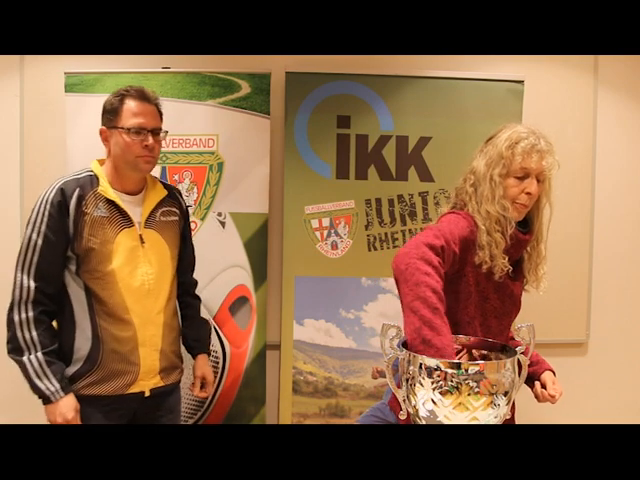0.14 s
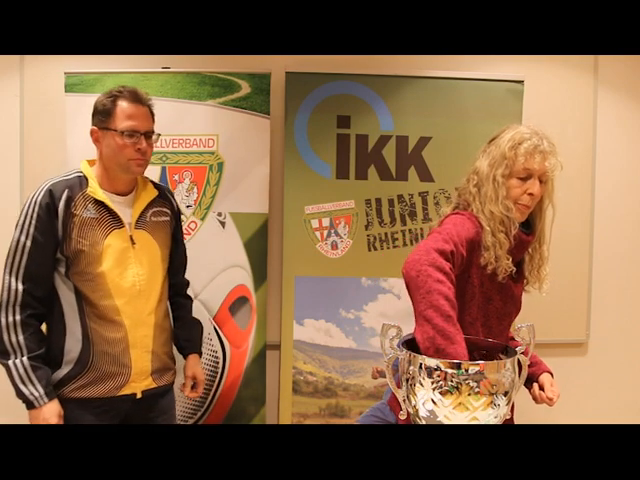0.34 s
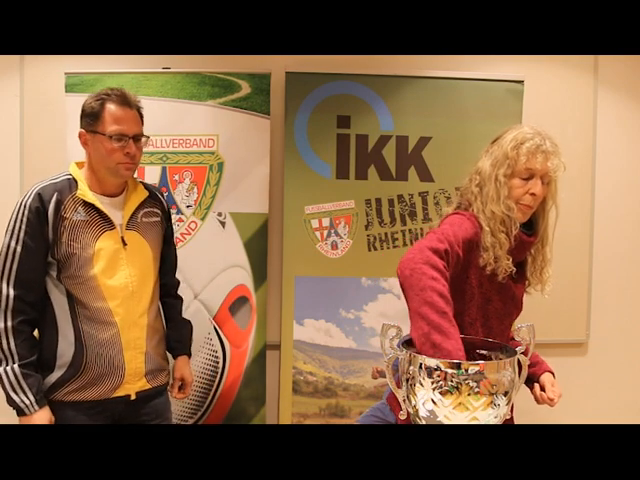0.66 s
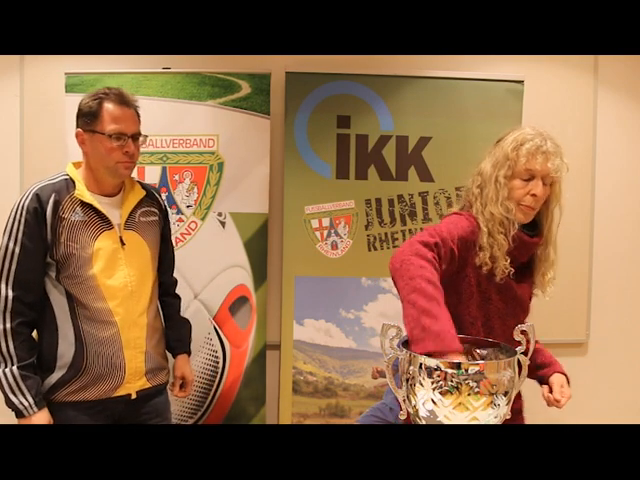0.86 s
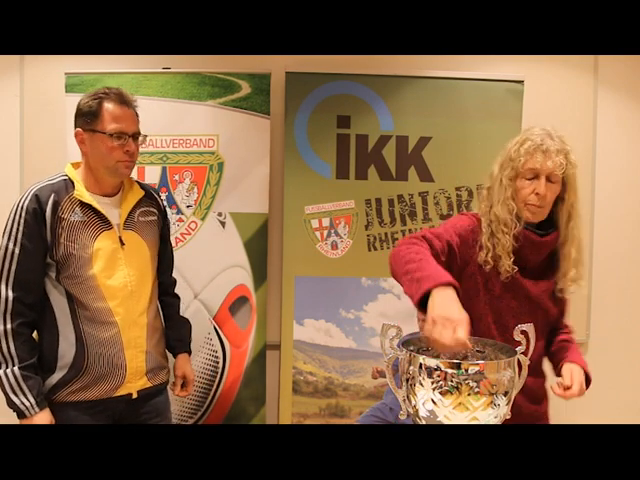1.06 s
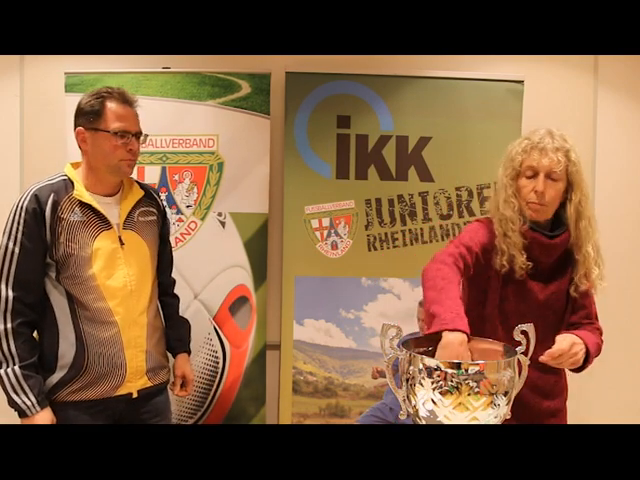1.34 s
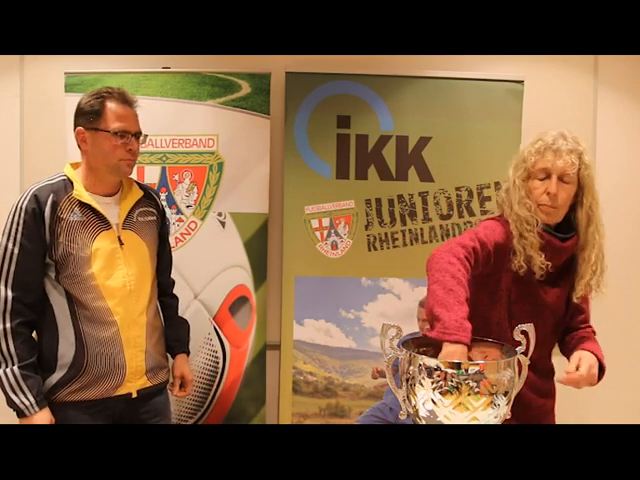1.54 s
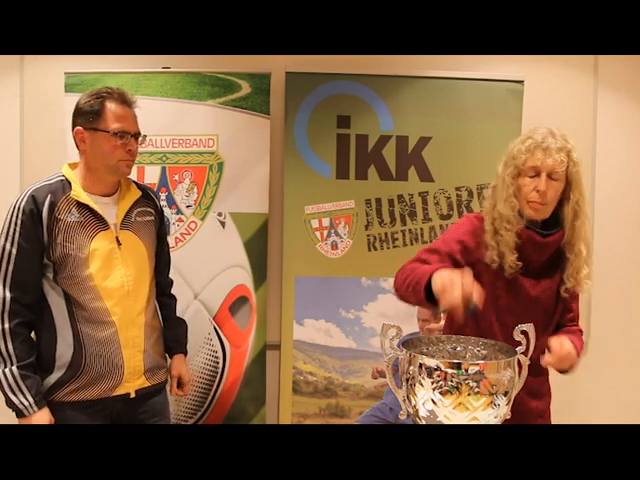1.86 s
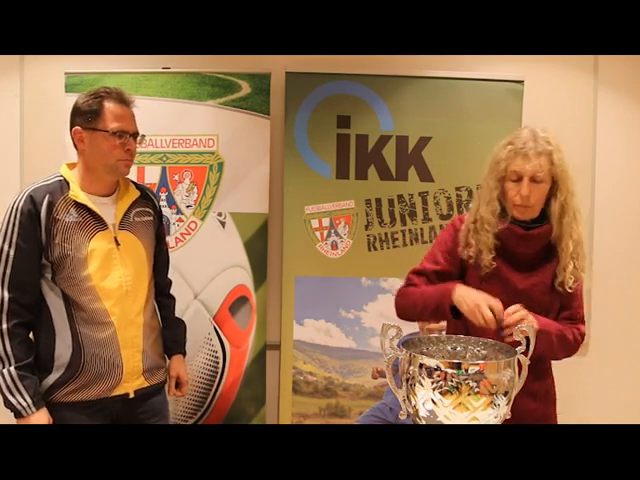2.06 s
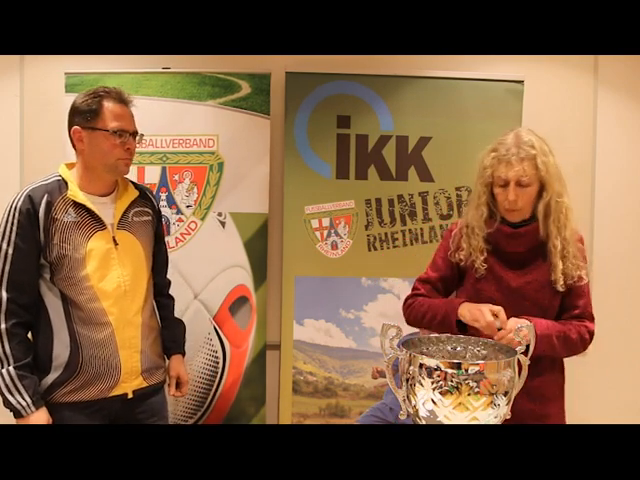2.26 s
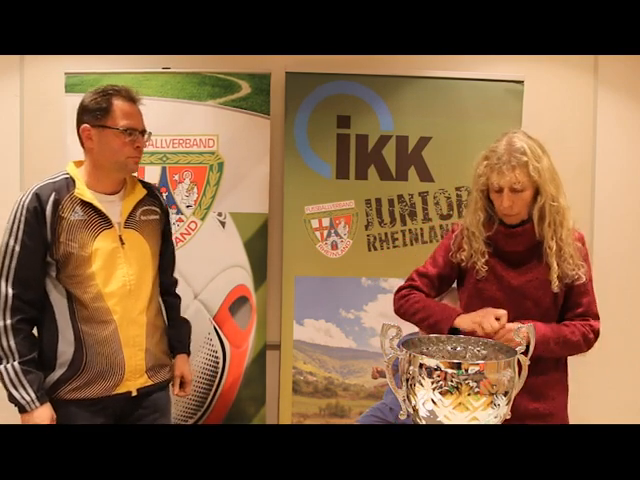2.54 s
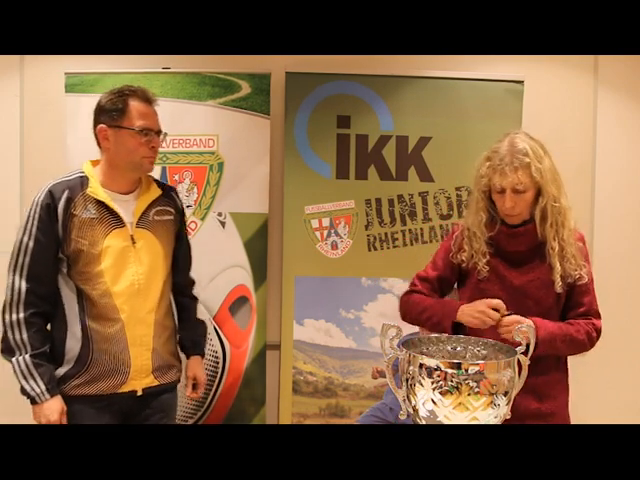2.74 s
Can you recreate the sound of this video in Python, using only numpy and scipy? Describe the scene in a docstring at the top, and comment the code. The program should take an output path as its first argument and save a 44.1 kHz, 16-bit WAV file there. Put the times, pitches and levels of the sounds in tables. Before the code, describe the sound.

Hard capsules clatter loudly as a hand stirs them in a metal trophy cup, which rings over a faint low boom. They settle near 1 second, the rim clinks, and a second stir runs from 1.2 to 1.6 seconds. The ring fades while fingers softly rub one capsule, which snaps open with a small pop at about 2.7 seconds. The bare office adds a short echo.

```python
"""A sharp clatter and a bright metal ring: a hand stirs lots in small hard capsules round a trophy cup.
Every hit on the big cup's wall clacks and keeps the metal ringing, over a low boom from its stand.
The capsules settle, are stirred once more, and the ring dies away. Fingers lift one out and rub it;
its halves snap apart and the air inside pops. One microphone hears it a few steps away in a bare office."""
import sys
import numpy as np
from scipy import signal
from scipy.fft import rfft, irfft, next_fast_len
from scipy.io import wavfile
from scipy.ndimage import uniform_filter1d

SR = 44100
rng = np.random.default_rng(int(sys.argv[2]) if len(sys.argv) > 2 else 0)


def write(x):
    x = np.atleast_2d(x).T
    wavfile.write(sys.argv[1], SR, np.round(np.clip(x, -1, 1) * 32767).astype(np.int16))


N = 127890


def amp(db):
    """Turn decibels into a plain multiplier."""
    return 10 ** (np.asarray(db) / 20)


def unit(x):
    """Scale a signal to an average power of 1."""
    return x / np.sqrt(np.mean(x ** 2) + 1e-20)


def along(points, hz):
    """Read between (frequency, value) points on a log frequency axis."""
    freqs, values = np.transpose(points)
    return np.interp(np.log(hz + 1), np.log(freqs + 1), values)


def fade(t, t60):
    """Die away by 60 dB in t60 seconds, the fade time."""
    return np.exp(-np.log(1000) * t / t60)


def filtered(x, response):
    """Multiply each frequency in x by response(hz)."""
    n = x.shape[-1]
    padded = next_fast_len(n + SR // 20)
    return irfft(rfft(x, padded) * response(np.fft.rfftfreq(padded, 1 / SR)), padded)[..., :n]


def noise(spectrum, shape):
    """Noise of power 1; the spectrum sets only its tone colour."""
    return unit(filtered(rng.standard_normal(shape), lambda hz: amp(along(spectrum, hz))))


def placed(times, sounds):
    """Add each sound to one track at its start time."""
    track = np.zeros(N + 2 * SR)
    for start, sound in zip(times, sounds):
        track[max(round(start * SR), 0):][:len(sound)] += sound
    return track[:N]


def bursts(times, db, t60):
    """A loudness curve that jumps up at each time, then fades."""
    t = np.arange(SR // 2) / SR
    return np.sqrt(placed(times, np.outer(amp(db), fade(t, t60)) ** 2))


def ringing(times, hz, db, t60, size, scatter_db=4):
    """Fading tones, mixed anew by each spot struck; db has a row per hit and a column per tone."""
    t = np.arange(size, dtype=np.float32) / SR
    hz, t60 = np.float32(hz)[:, None], np.float32(t60)[:, None]
    scatter = scatter_db * rng.uniform(-1.27, 1, db.shape) * np.sqrt(3)
    gains = amp(db + scatter) * rng.choice([-1, 1], db.shape)
    tones = np.sin(2 * np.pi * hz * t) * fade(t, t60)
    return placed(times, np.float32(gains) @ np.float32(tones))


def beating(hz, t60, spread, count=4):
    """Close tones start as one, then drift out of step, so their sound wobbles."""
    t = np.arange(SR // 2) / SR
    close_hz = hz * (1 + spread * rng.standard_normal((count, 1)))
    return np.sin(2 * np.pi * close_hz * t).mean(axis=0) * fade(t, t60)


# How hard the hand stirs. Depth is the extra bass of a hit low in the bowl: t/s, level/dB, depth/dB
STIRRING = [(0, 9.5, -5), (.06, -8.5, -22), (.15, 2.5, -3), (.27, 0, -20), (.4, -1.5, -4),
            (0.459, 0.5, -6.5), (0.569, 3.5, -1.5), (.63, -6, -2), (.72, -3.5, 11), (.8, -8, -1.5),
            (.95, -14.5, 16.5), (1.04, -25.5, 24.5), (1.2, -31.5, 0), (1.281, 0, 4.5), (1.35, 2, 1),
            (1.42, -8.5, 5.5), (1.52, -13.5, 4.5), (1.558, 3, 1), (1.631, -20, 26.5), (1.7, -30, 16),
            (1.801, -55, 4)]
# The hard knocks on the wall: t/s, level/dB, brightness/dB, depth/dB, ping f/Hz, ping level/dB
KNOCKS = [(0.0119, 0, -5.5, -15, 1805, -9.5), (0.0318, -21, 12, -11, 1865, -20),
          (.0797, -7.5, 12.5, -48, 4970, -16), (.0835, -9.5, 10, -39, 1865, -12),
          (0.1004, -10, -4, -4, 2893, -13.5), (0.1232, -11, 9.5, 5, 4770, -27),
          (0.183, -5, -1, 3, 3230, -15.5), (0.207, -3.5, -6, 2.5, 1822, -13),
          (0.3011, -9.5, 14.5, 13.5, 4290, -13.5), (0.3642, -3, 4.5, -17, 3350, -13.5),
          (0.3711, -2.5, -6, -7, 4046, -14), (0.4124, -4.5, -34, -31, 2580, -18),
          (0.5433, -3.5, 3, -28, 1780, -13), (0.6103, -5, 2, 11.5, 880, -18.5),
          (0.6209, -7.5, 13.5, -24, 4338, -9), (0.6562, -13.5, 9, -7, 2822, -12.5),
          (0.9089, -10, -5.5, 4.5, 1250, -26.5), (1.1426, -8.5, 17, 1, 3258, -12.5),
          (1.2333, -5, 11.5, 0.5, 1758, -10.5), (1.2529, -11.5, 3, 9, 1790, -10.5),
          (1.3356, -13.5, 3, 7, 1772, -11), (1.3518, -2.5, -8.5, 11, 3000, -25),
          (1.5378, -6.5, 4, 8.5, 3140, -20)]

def capsule_hits(count=260, stir_s=1.8):
    """Time, level, brightness and depth of the hard knocks and of a rattle that follows the stirring."""
    jitter = rng.random(count)
    scatter = np.clip(rng.standard_normal((count, 2)), -2, 1)
    times = (np.arange(count) + 2 * jitter) * stir_s / count
    stir_times, stir_db, stir_depth = np.transpose(STIRRING)
    db = np.interp(times, stir_times, stir_db) - 12.5 + 3 * scatter[:, 0]
    bright = -5 + 8 * scatter[:, 1]
    rattle = np.column_stack([times, db, bright, np.interp(times, stir_times, stir_depth)])
    return np.vstack([np.array(KNOCKS)[:, :-2], rattle]).T


def pings(overtone_ratio=1.505, overtone_db=-8):
    """A hard knock rings the wall at the pitch of the spot it hits, plus one higher tone."""
    ring = lambda hz: beating(hz, t60=0.17, spread=0.0071)
    sounds = [amp(db) * (ring(hz) + amp(overtone_db) * ring(overtone_ratio * hz))
              for *_, hz, db in KNOCKS]
    return placed([row[0] for row in KNOCKS], sounds)


# How much of a hit's depth is added to each pitch's level: f/Hz, share
DEPTH_SHARE = [(600, 0.57), (1100, 0.83), (2000, 0.2), (2900, -0.22), (5000, 0.16)]
# The cup's own long-lasting tones: f/Hz, level/dB, fade time/s
CUP_TONES = [(620, -7, .5), (835, -11, .5), (1068, -6, .65), (1225, -2, .6), (1378, -10, .55),
             (1414, -5, .55), (1555, -22, 1.9), (1785, 0, .35), (1822, -1, .3), (1867, 3, .55),
             (2068, 2, .5), (2229, 1, .85), (2385, -12, 1), (2423, -6, .85), (2476, -8, .7),
             (2574, -3, 1.1), (2628, -4, .7), (2768, 0, .6), (2832, 6, .6), (2944, 0, .75), (3073, -3, .85),
             (3263, -1, .45), (3596, -6, .4), (3820, -8, .5), (4210, -7, .4), (4323, -6, .45),
             (4930, -8, .5), (5200, -12, .5), (5846, -13, .35), (6500, -12, .35)]

def cup_ring(times, db, depth, ring_db=-28.5, scatter_db=2.5, already_ringing_db=2.5):
    """Each hit feeds the cup's tones energy and jolts their phase, more so the bigger its share."""
    hit_samples = np.round(np.abs(times) * SR).astype(int)
    ring = np.zeros(N)
    for hz, level, t60 in CUP_TONES:
        scatter, jolt = rng.standard_normal((2, len(times)))
        hit_energy = amp(db + depth * along(DEPTH_SHARE, hz) + scatter_db * scatter) ** 2
        feed = np.bincount(hit_samples, hit_energy, N)
        feed[0] += amp(already_ringing_db) ** 2
        energy = signal.lfilter([1], [1, -fade(1 / SR, t60) ** 2], feed)  # builds up and leaks away
        jumps = jolt * np.sqrt(hit_energy / energy[hit_samples])
        phase = np.cumsum(np.bincount(hit_samples, jumps, N)) + 2 * np.pi * rng.random()
        tone = np.sin(2 * np.pi * hz * np.arange(N) / SR + phase)
        ring += amp(ring_db + level) * np.sqrt(energy) * tone
    return ring


# How much of a hit's brightness reaches each pitch: f/Hz, share
BRIGHT_SHARE = [(2200, 0.012), (6000, 0.85)]
# Tone colour of a capsule's dry clack: f/Hz, level/dB
CLACK_COLOUR = [(100, -29), (700, -3), (1100, 1), (1450, 10.5), (1830, -1.5), (2350, -7), (2900, -1.5),
                (4200, -4.5), (6000, -3), (9000, -15.5), (15500, -25)]

def clacks(times, db, bright):
    """Each hit makes a tiny crack and a short clack; bright hits carry more treble."""
    def loudness(level):
        clack = bursts(times, level - 15, t60=0.024)
        crack = bursts(times, level - 25.5, t60=0.0025)
        return np.hypot(clack, crack)

    whole = noise(CLACK_COLOUR, N)
    treble = filtered(whole, lambda hz: along(BRIGHT_SHARE, hz))
    return (whole - treble) * loudness(db) + treble * loudness(db + bright)


# The wall's loud, short tones: f/Hz, level/dB, fade time/s
CLANG_TONES = [(1790, -26, .12), (1860, -25, .14), (2810, -23, .15), (2860, -24, .14)]

def clang(times, db, depth):
    """One hit after another adds or cancels, so the wall's clang flares and wobbles."""
    hz, level, t60 = np.transpose(CLANG_TONES)
    hit_db = db - 0.09 * depth  # hits deep in the bowl clang less
    return ringing(times, hz, hit_db[:, None] + level, t60, size=SR // 3)


# Tone colour of the wall's many weaker tones: f/Hz, level/dB
SHIMMER_COLOUR = [(550, -29.5), (740, -19), (900, -16.5), (1100, -7), (1500, -14), (1800, 3), (2500, -1.5),
                  (3100, -2.5), (4300, -2.5), (5500, -11.5), (8000, -11.5), (11000, -15), (16000, -29)]
# How long they last: f/Hz, fade time/s
SHIMMER_FADE = [(500, 0.2), (3000, 0.17), (8000, 0.17), (15000, 0.047)]

def shimmer(times, db, bright, depth, count=360, shimmer_db=-19, spot_db=7):
    """A crowd of short wall tones; every spot struck brings out different groups of them."""
    hz = 550 + 15300 * ((np.arange(count) + rng.random(count)) / count) ** 1.5
    level = shimmer_db + db[:, None] + along(SHIMMER_COLOUR, hz)
    level += np.outer(bright, along(BRIGHT_SHARE, hz)) + np.outer(depth, along(DEPTH_SHARE, hz))
    groups = unit(uniform_filter1d(rng.standard_normal(level.shape), size=6, axis=1))
    level += spot_db * np.tanh(2 * groups)
    return ringing(times, hz, level, along(SHIMMER_FADE, hz), size=SR // 2) / np.sqrt(count / 10)


# Tone colour of the cup's base on the table: f/Hz, level/dB
BASE_COLOUR = [(40, -40), (90, -39), (130, 1.5), (290, -7.5), (350, 9), (480, 6.5), (640, -3), (760, -5),
               (1500, -41)]
# Soft bumps of the hand in the cup: t/s, level/dB
HAND_BUMPS = [(0.941, -21.5), (0.989, -31), (1.144, -26), (1.235, -21), (1.311, -23)]

def thuds(times, db):
    """The capsules and the hand shake the cup's base."""
    from_capsules = bursts(times, db - 36.5, t60=0.12)
    from_hand = bursts(*np.transpose(HAND_BUMPS), t60=0.11)
    return noise(BASE_COLOUR, N) * np.hypot(from_capsules, from_hand)


# Tone colour of the stand: f/Hz, level/dB
STAND_COLOUR = [(30, -32), (70, -28), (88, -4), (130, 0), (148, -9), (165, 10), (185, -16), (280, 2),
                (2000, -40)]
# How its boom swells and fades: t/s, level/dB
BOOM_LEVEL = [(0, -56.5), (.8, -47), (1.28, -46.5), (1.4, -39), (1.55, -43.5), (1.9, -60.5), (2.2, -70)]

def stand_boom():
    """The stand under the cup gives a low drone."""
    db = np.interp(np.arange(N) / SR, *np.transpose(BOOM_LEVEL))
    return noise(STAND_COLOUR, N) * amp(db)


# Tone colour of the background: f/Hz, level/dB
BACKGROUND_COLOUR = [(15, -46), (25, -11), (137, -2.5), (427, 1.5), (675, -4.5), (1690, -4), (6710, -12),
                     (13500, -19), (15900, -31)]

def background(db=-46.5):
    """A faint, steady rush lies under everything."""
    return amp(db) * noise(BACKGROUND_COLOUR, N)


# How long the office echoes: f/Hz, fade time/s
ECHO_FADE = [(150, 0.61), (1000, 0.49), (4000, 0.43), (12000, 0.2)]

def office_echo(x, onset_s=0.0014):
    """The bare room smears each sound into a tail whose treble dies first."""
    hz, t, bands = signal.stft(rng.standard_normal(SR // 2), SR, nperseg=256)
    _, tail = signal.istft(bands * fade(t, along(ECHO_FADE, hz)[:, None]), SR, nperseg=256)
    tail *= 1 - np.exp(-(np.arange(len(tail)) / SR / onset_s) ** 2)
    return signal.fftconvolve(x, tail / np.linalg.norm(tail))[:N]


# The tones of the cup's rim: f/Hz, level/dB, fade time/s
RIM_TONES = [(1147, -4, 0.095), (1785, 2, 0.063), (2055, 0.5, 0.049), (2860, -2, 0.9), (3215, 1.5, 0.39),
             (3960, 7.5, 0.035), (4730, 3, 0.056), (5830, -1, .07), (7500, -4, 0.087), (8930, 1.5, 0.08)]

def rim_clink(start_s=1.1426, clink_db=-13):
    """One hit high on the rim gives a bright, harsh clink."""
    tones = [amp(clink_db + db) * rng.choice([-1, 1]) * beating(hz, t60, spread=0.018)
             for hz, db, t60 in RIM_TONES]
    return placed([start_s], [sum(tones)])


# Finger strokes on the drawn capsule: t/s, length/s, level/dB, centre f/Hz
RUBS = [(1.705, 0.07, -49, 6900), (2.141, 0.056, -46, 4840), (2.375, 0.041, -44, 2170),
        (2.436, 0.044, -45.5, 2300), (2.563, 0.1, -46.5, 2400)]

def finger_rubs(width_octaves=0.67):
    """Fingers pick out a capsule and rub it; each stroke is a soft swell of hiss."""
    rubs = []
    for _, length, db, centre in RUBS:
        band = lambda hz: np.exp(-.5 * (np.log2((hz + 1) / centre) / width_octaves) ** 2)
        hiss = unit(filtered(rng.standard_normal(SR // 4), band))
        swell = np.hanning(int(length * SR))
        rubs.append(amp(db) * swell * hiss[:len(swell)])
    return placed([row[0] for row in RUBS], rubs)


# Tone colour of the shell's snap: f/Hz, level/dB
SNAP_COLOUR = [(200, -12), (900, 4), (1600, -2), (2200, 1), (3200, -0.5), (4500, -8), (6500, 5), (9000, -3),
               (15000, -12)]
# The capsule gives, then pops open: t/s, level/dB, air f/Hz, extra snap level/dB
POPS = [(2.566, -32, 770, -14), (2.574, -33, 694, -7), (2.6672, -23, 1083, 2)]

def capsule_pops(glide_per_s=-1.8):
    """The halves snap apart and the air in the shell rings, its pitch sliding down as the gap changes."""
    t = np.arange(SR // 4) / SR
    sounds = []
    for _, db, hz, snap_db in POPS:
        air = np.sin(2 * np.pi * hz * (t + glide_per_s * t ** 2 / 2)) * fade(t, t60=0.041)
        snap = amp(snap_db) * noise(SNAP_COLOUR, len(t)) * fade(t, t60=0.019)
        sounds.append(amp(db) * (air + snap))
    return placed([row[0] for row in POPS], sounds)


def scene(low_cut_hz=242):
    """Cup, capsules and hand in the office, the same on both channels."""
    times, db, bright, depth = capsule_hits()
    ring = cup_ring(times, db, depth)
    short_sounds = clang(times, db, depth) + shimmer(times, db, bright, depth)
    short_sounds += clacks(times, db, bright) + thuds(times, db + depth) + pings()
    short_sounds += rim_clink() + finger_rubs() + capsule_pops()
    echo = office_echo(amp(-2) * short_sounds + amp(-9) * ring)
    low_cut = signal.butter(2, low_cut_hz, "high", fs=SR, output="sos")
    mono = signal.sosfilt(low_cut, ring + short_sounds + echo) + stand_boom() + background()
    return np.array([mono, mono])


def record(dry, ceiling=1.15, top_hz=15900):
    """Round off the loudest peaks and remove the very highest treble."""
    rounded = dry / (1 + (dry / ceiling) ** 4) ** (1 / 4)
    return filtered(rounded, lambda hz: hz < top_hz)


dry = scene()
out = record(dry)
write(out)
```